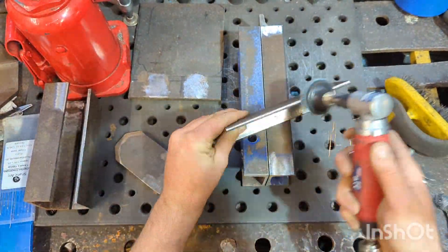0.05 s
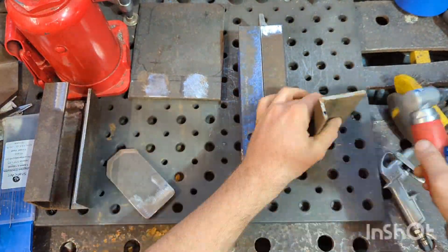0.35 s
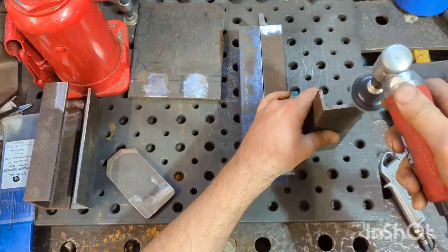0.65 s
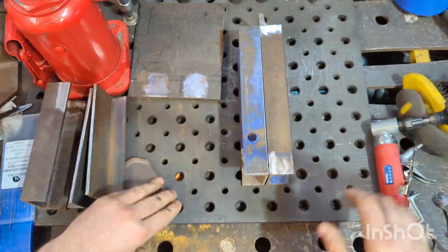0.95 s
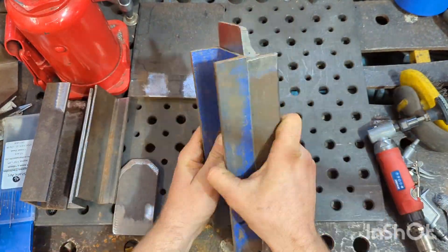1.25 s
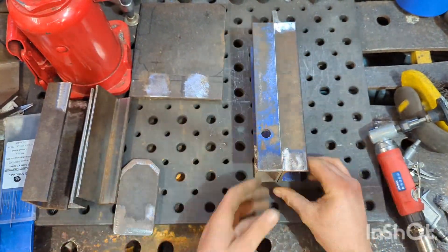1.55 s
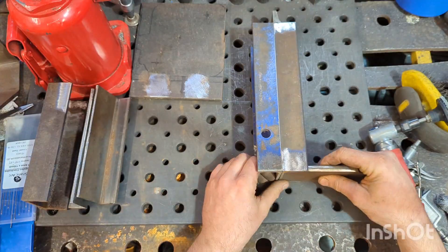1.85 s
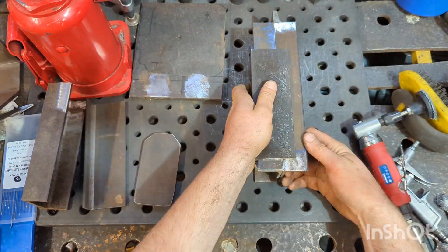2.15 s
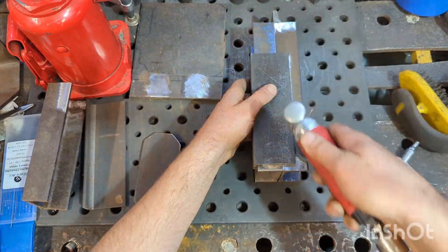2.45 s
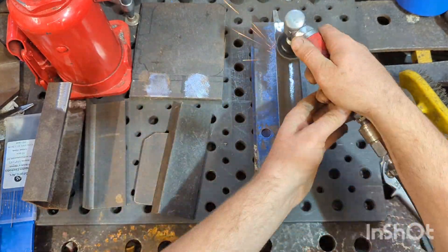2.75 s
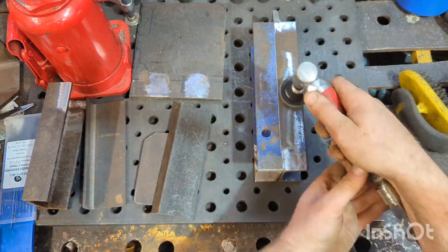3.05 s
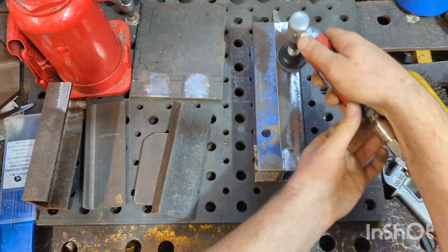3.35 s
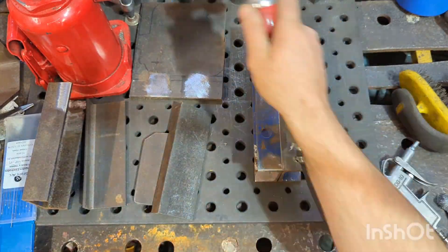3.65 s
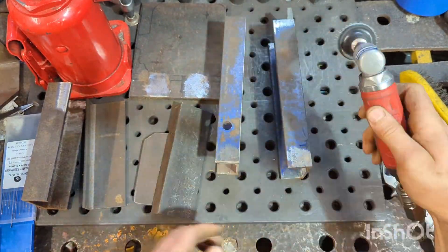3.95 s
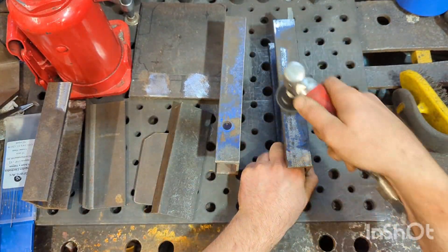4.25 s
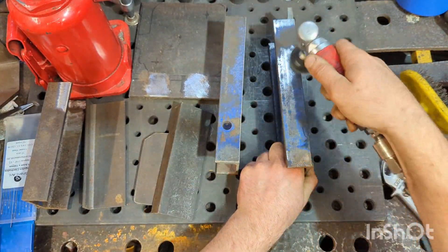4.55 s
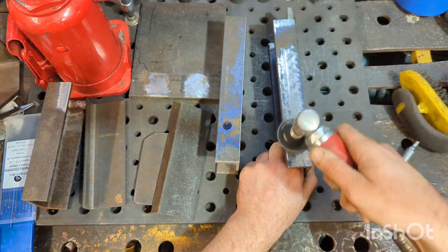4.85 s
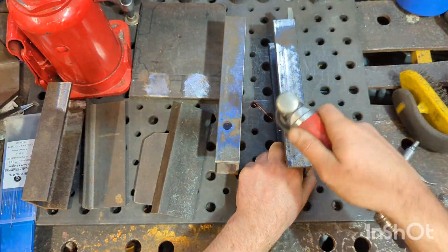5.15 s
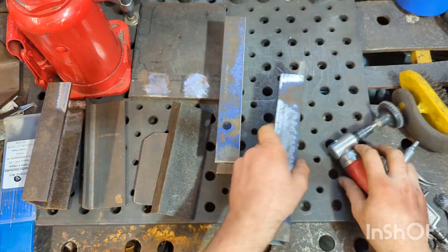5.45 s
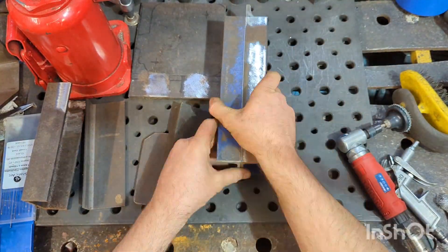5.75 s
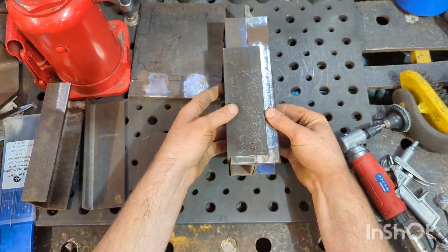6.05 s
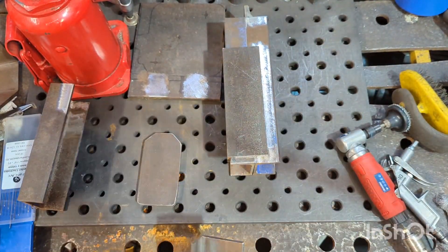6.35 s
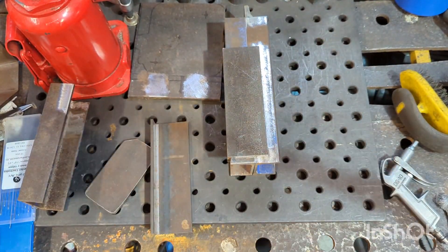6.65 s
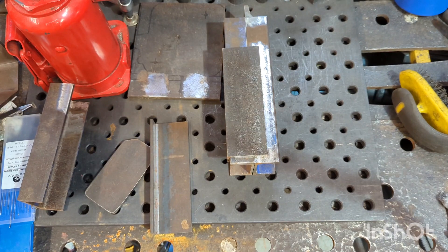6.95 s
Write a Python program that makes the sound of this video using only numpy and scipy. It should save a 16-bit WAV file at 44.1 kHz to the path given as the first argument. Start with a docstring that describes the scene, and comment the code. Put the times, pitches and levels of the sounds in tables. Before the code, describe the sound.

Choppy bursts of an air grinder rasping on steel alternate with clanks of parts set down, as a compressor-like drone joins halfway.

```python
"""Air die grinder on steel: rotor whine, grit scrape and exhaust air come in short bursts that break off
abruptly. Hand pressure slows the disc and the whine sags; the disc grabs edges and makes the steel squeal.
Mostly between bursts, steel pieces and the tool are set down on a welding table, every ring cut short. From
about 4 s a machine, probably a compressor, drones and hisses in the workshop."""
import sys
import numpy as np
from scipy import signal
from scipy.fft import rfft, irfft, next_fast_len
from scipy.io import wavfile
from scipy.ndimage import map_coordinates

SR = 44100
rng = np.random.default_rng(int(sys.argv[2]) if len(sys.argv) > 2 else 0)


def wav_record(signal):
    """Record a signal, one row per channel, as 16-bit PCM in the file named by sys.argv[1]."""
    frames = np.transpose(np.atleast_2d(signal))
    bounded = np.clip(frames, -1, 1)
    # unit amplitude maps onto the largest positive 16-bit level
    quanta = np.round(bounded * 32767).astype(np.int16)
    wavfile.write(sys.argv[1], SR, quanta)


N = 312651

# Room tone spectrum: f/Hz, relative density/dB
ROOM_SPECTRUM = [(30, -15.5), (90, -7), (200, -12.5), (300, -8), (420, 3), (800, -12), (2000, -14.5),
                 (5000, -24), (15000, -32.5)]
# Room tone envelope: t/s, level/dB
ROOM_LEVEL = [(.15, -72.5), (1.02, -64.5), (1.18, -77), (1.65, -73.5), (1.8, -88), (2.02, -67), (2.2, -74)]
# Workshop decay: f/Hz, t60/s
ROOM_DECAY = [(200, 0.14), (2000, 0.12), (12000, 0.033)]
# Stereo image of room tone and machine: f/Hz, left-right coherence
ROOM_COHERENCE = [(60, 0.97), (170, 1), (280, 0.87), (420, 0.57), (950, -0.35), (2400, -0.0067),
                  (15000, .05)]

# Machine envelope: t/s, drone level/dB, hiss level/dB
MACHINE_LEVELS = [(4.05, -100, -100), (4.09, -39, -44), (5.4, -39.5, -40.5), (5.5, -37, -40.5),
                  (5.8, -35.5, -38.5), (6.92, -34, -36.5), (7.0, -38.5, -37.5), (7.09, -43, -63)]
# Machine noise spectra: f/Hz, relative density/dB
DRONE_SPECTRUM = [(15, -43.5), (25, -17), (141, 0.5), (173, -5.5), (206, -2.5), (285, -10), (368, -9.5),
                  (408, -12.5), (493, -11.5), (575, -3.5), (648, -8.5), (852, -3), (1160, -12.5),
                  (1330, -19), (1500, -46.5), (1950, -66.5), (3300, -120)]
HISS_SPECTRUM = [(900, -3), (1400, -4), (2300, -1.5), (3000, -9), (4000, -6), (5200, -13.5), (6000, -5),
                 (6550, 3), (7300, -16.5), (8600, -16), (9500, -22), (11200, -24.5), (14000, -15),
                 (16000, -22.5)]
# Machine hum lines: f/Hz, relative level/dB
HUM_LINES = [(92, -55.5), (150.7, -44.5), (205, -47), (220, -50), (258, -51.5), (367, -51), (440, -54),
             (566, -51), (587, -48), (786, -46.5), (836, -47.5), (856, -47), (1026, -54), (1165, -52)]

# Modes of angle iron, flat plate, channel section, table: f/Hz, relative level/dB, free t60/s
ANGLE_MODES = [(1863, -6, 0.39), (3450, -2.5, 0.26), (3600, -12.5, 0.13), (4135, -4.5, 0.39),
               (5028, -16, .2), (5700, -12.5, 0.2), (6400, -11, 0.2), (7800, -16, 0.1), (8600, -10, 0.11),
               (9850, -23.5, .1), (12280, -16.5, .15), (13500, -20, .15)]
PLATE_MODES = [(1560, -8.5, 0.065), (1830, -2, .15), (3880, -32, 0.31), (4040, -3, .15), (4590, 1.5, 0.22),
               (5900, -24, .15), (7000, -15.5, .1), (10020, -0.5, 0.25), (11800, -1, 0.083),
               (13100, -4, 0.37)]
CHANNEL_MODES = [(1830, -5.5, 0.33), (3400, -2.5, .1), (3671, -5.5, .2), (4130, -1, 0.45),
                 (5087, -10, 0.17), (6220, 0, 0.088), (7720, -9.5, 0.09), (8950, -3, .08),
                 (11800, -6.5, 0.19), (12440, -30.5, .08), (15500, -18, .15)]
TABLE_MODES = [(404, -11, 0.12), (650, -5, 0.19), (1220, -4, 0.12), (2150, 3, 0.07), (2400, -2, 0.28),
               (2620, -8, 0.081), (3260, -11.5, .08), (3580, -3, 0.089), (6900, -22.5, 0.093)]
# Blows on each: t/s, level/dB, rise/s, tilt/(dB/octave), favoured mode f/Hz, its lead/dB
ANGLE_CLINKS = [(.197, -32.5, 0.0032, -4.5, 1863, -0.5), (.232, -41.5, .013, -5.5, 4170, -3),
                (.28, -51, 0.01, -5, 4170, 0), (.35, -36, .016, -3, 4130, 3),
                (.592, -40, .003, -6, 4230, -2), (.884, -48, .013, 0, 3550, -7),
                (.911, -32.5, 0.0083, -1, 3580, 3), (.971, -36, 0.01, -0.5, 3790, 18),
                (1.003, -49, 0.0045, -10, 1560, -7), (2.141, -45.5, .013, -6, 1863, -3),
                (5.95, -32, .0035, 1, 5520, -1.5), (6.009, -24, 0.0018, -3, 1863, -2.5),
                (6.198, -25, .02, 2.5, 5560, 4)]
PLATE_CLACKS = [(.3113, -25, 0.0068, 0, 3840, 1.91), (1.096, -35, .014, 0, 6750, 4.6),
                (1.924, -28, 0.024, -1, 3790, 8), (1.926, -24, 0.023, 1, 13100, 6)]
CHANNEL_CLANKS = [(2.026, -41.5, 0.0067, -9, 1830, -4), (2.052, -23.5, .006, -0.6, 5087, 8),
                  (2.089, -25.5, 0.01, 3, 11800, 1), (2.533, -27.5, .012, 0.5, 3482, -5)]
TABLE_KNOCKS = [(1.336, -25.5, .004, -4.5, 2150, 3.1), (1.3435, -27.5, .0011, -1, 6900, 1.4),
                (1.628, -57, 0.0098, -3, 4630, 3.5), (1.675, -53.5, 0.0079, -4, 1950, 5.5),
                (3.892, -26.5, 0.0035, -4.5, 2400, 21), (3.911, -32, 0.0038, -1, 2620, 10.5),
                (5.642, -29.5, 0.0034, 4.5, 6000, 1.5)]
# Crowded steel modes: f/Hz, relative density/dB
CLATTER_SPECTRUM = [(80, -29), (400, -15), (1000, -11.5), (1900, -5), (4000, -5), (5200, -6.5), (7500, -9),
                    (10000, -15.5), (12500, -17.5), (16000, -31)]

# Disc grabs an edge: t/s, level/dB, rise/s, life/s, f/Hz
DISC_GRABS = [(.428, -45.5, 0.0046, 0.014, 311), (2.564, -32, 0.0031, 0.018, 296),
              (3.445, -34, 0.0027, 0.029, 420), (3.974, -32.5, .008, 0.011, 370)]
# Disc catches a steel mode: centre t/s, f/Hz, level/dB
DISC_SQUEALS = [(.574, 6280, -36.5), (.693, 2130, -35), (2.46, 3390, -31.5), (2.779, 5133, -33.5),
                (2.86, 1560, -33), (2.866, 3130, -32.5), (3.511, 2870, -32.5), (4.385, 3489, -31.5),
                (4.78, 3138, -34.5), (5.225, 3170, -29)]
# Held workpiece resonances: f/Hz, width/Hz, relative level/dB
WORK_MODES = [(3170, 540, -10.5), (6500, 900, 3), (8780, 100, 1)]
# Rotor orders: multiple of the pitch, relative level/dB
ROTOR_ORDERS = [(1, 4), (2, -7.5), (3, -16.5), (4, -21.5), (5, -29.5), (6, -18)]
# Grinder noise spectra: f/Hz, relative density/dB
SCRAPE_SPECTRUM = [(30, -38.5), (90, -17), (200, -10), (450, -7), (800, -1.5), (1300, -2.5), (2200, 2.5),
                   (3500, 3.5), (5200, 0), (6600, -2.5), (8300, -4.5), (9500, -9), (16000, -14.5)]
EXHAUST_SPECTRUM = [(3000, -34), (7000, -9), (9500, -10), (10400, -6.5), (11200, -7.5), (12300, 0),
                    (13500, -6.5), (15000, -3.5), (16000, -17.5)]
# Grinder stereo image: f/Hz, left-right coherence
GRINDER_COHERENCE = [(60, 0.94), (180, 0.59), (550, 0.77), (1650, 0.11), (4970, 0.04), (15000, 0.09)]
# Grinder balance: f/Hz, left minus right/dB
GRINDER_BALANCE = [(300, -0.5), (640, 0), (1400, 0), (3100, -2), (6800, -4), (9000, 1), (15000, 1)]
# Grinder bursts: start/s, end/s, rise/s, scrape level/dB, exhaust level/dB
GRINDER_BURSTS = [(-.02, 0.117, .01, -31, -31.5), (0.423, 0.598, 0.022, -29.5, -33),
                  (0.639, 0.857, 0.0024, -30, -33), (2.364, 2.515, 0.022, -28, -33.5),
                  (2.547, 3.75, 0.015, -29, -35), (3.97, 5.363, 0.014, -30, -32),
                  (5.386, 5.457, .014, -28.5, -34.5), (6.954, 7.119, 0.019, -33, -28)]
# Whine, one table per pass over the steel: t/s, nominal f/Hz, nominal level/dB
DISC_PASSES = [
    [(0.005, 947, -36), (0.079, 963, -39.5), (0.087, 1118, -33), (0.105, 1131, -41.5)],
    [(0.44, 1201, -41), (0.51, 898, -44.5), (0.52, 1152, -31), (0.554, 1128, -31), (0.568, 825, -33.5),
     (0.585, 824, -34.5)],
    [(0.645, 1313, -34), (0.681, 1255, -42), (0.707, 950.6, -35), (0.767, 884.7, -34.5), (0.809, 1213, -36),
     (0.833, 677, -29), (0.845, 679, -39)],
    [(2.375, 1064, -37.5), (2.403, 1197, -33), (2.469, 801, -30), (2.5, 813, -37)],
    [(2.58, 1274, -46), (2.592, 1272, -34.5), (2.676, 921.5, -31.5), (2.74, 824.9, -33.5),
     (2.89, 777.8, -38), (2.956, 885, -30), (3.156, 591.3, -39), (3.28, 582.8, -31.5),
     (3.302, 524.8, -37.5), (3.416, 657, -35), (3.444, 597.9, -49), (3.524, 718.6, -39), (3.55, 544.3, -28),
     (3.578, 703, -40), (3.598, 665.7, -27.5), (3.632, 1046, -37), (3.7, 1074, -31.5), (3.73, 855, -52.5)],
    [(3.99, 1034, -35), (4.016, 1173, -30), (4.058, 707.7, -31), (4.224, 628, -31), (4.266, 536.9, -33),
     (4.454, 612.8, -33), (4.682, 536.4, -29), (4.902, 681.2, -37.5), (4.928, 525.3, -32),
     (5.012, 433.9, -32), (5.05, 519.7, -39.5), (5.08, 467.4, -35.5), (5.13, 588, -29), (5.19, 514, -33),
     (5.22, 814.7, -40), (5.288, 645.7, -31), (5.33, 1000, -43.5), (5.35, 1033, -36)],
    [(5.4, 1198, -49.5), (5.435, 1114, -34), (5.47, 1105, -80)],
]

TOP_HZ = 15950


def amp(db):
    """Decibels to gain."""
    return 10 ** (np.asarray(db) / 20)


def unit(x):
    """Scale to rms 1."""
    return x / np.sqrt(np.mean(x ** 2) + 1e-20)


def split(difference):
    """Left-minus-right difference as two opposite halves."""
    return difference * np.array([[.5], [-.5]])


def along(points, hz):
    """(f/Hz, value) points read on a log axis."""
    f, v = np.transpose(points)
    return np.interp(np.log(hz + 1), np.log(f + 1), v)


def curves(rows):
    """Per-sample curve for each column after t/s."""
    s, *cols = np.transpose(rows)
    return [np.interp(np.arange(N) / SR, s, c) for c in cols]


def wobble(rate_hz):
    """Smooth random curve, knots at rate_hz."""
    knots = rng.standard_normal(int(N * rate_hz / SR) + 4)
    return map_coordinates(knots, [np.arange(N) * rate_hz / SR])


def filtered(x, response):
    """Apply a frequency response."""
    size = x.shape[-1]
    m = next_fast_len(size + 4096)
    return irfft(rfft(x, m) * response(np.fft.rfftfreq(m, 1 / SR)), m)[..., :size]


def stereo_noise(spectrum, coherence):
    """Noise of rms 1 with given spectrum and left-right coherence."""
    def response(hz):
        angle = np.arccos(np.clip(along(coherence, hz), -1, 1)) / 2
        return amp(along(spectrum, hz)) * [np.cos(angle), np.sin(angle)]
    mid, side = filtered(rng.standard_normal((2, N)), response)
    return unit(np.array([mid + side, mid - side]))


def ramp(u):
    """Smooth step, 0 to 1."""
    return np.sin(np.pi / 2 * np.clip(u, 0, 1)) ** 2


def choked(t, rise_s, life_s):
    """Contact envelope: builds up, then dies ever faster."""
    return ramp(t / rise_s) * np.exp(-(np.maximum(t - rise_s, 0) / life_s) ** 2)


def room_tone():
    """Faint, wavering noise of the still room."""
    level_db = curves(ROOM_LEVEL)[0] + 4.4 * wobble(17)
    return amp(level_db) * stereo_noise(ROOM_SPECTRUM, ROOM_COHERENCE)


def room_reverb(x):
    """Short tail of the cluttered workshop; treble dies first."""
    hz, t, z = signal.stft(rng.standard_normal((2, SR // 4)), SR, nperseg=256)
    tail = signal.istft(z * amp(-60 * t / along(ROOM_DECAY, hz)[:, None]), SR, nperseg=256)[1]
    return signal.fftconvolve(x, tail / np.linalg.norm(tail[0]), axes=1)[:, :N]


def machine(crank_hz=23.74, throb=.49, hum_gain_db=2, rumble_gain_db=-.5):
    """Piston-chopped rumble, unsteady hum lines and air hiss."""
    drone_db, hiss_db = curves(MACHINE_LEVELS)
    t = np.arange(N) / SR
    hum = np.zeros((2, N))
    for hz, db in HUM_LINES:
        # wall reflections put the higher lines out of step left to right
        offset_rad = split(np.arccos(np.clip(along(ROOM_COHERENCE, hz), -1, 1)))
        hum += amp(db) * np.sqrt(2) * np.sin(2 * np.pi * hz * t + offset_rad + .55 * wobble(16))
    hum *= amp(hum_gain_db + drone_db - drone_db.max())
    rumble = amp(drone_db + rumble_gain_db) * stereo_noise(DRONE_SPECTRUM, ROOM_COHERENCE)
    upper_rumble = filtered(rumble, lambda hz: hz ** 4 / (hz ** 4 + 600 ** 4))
    crank_rad = 2 * np.pi * crank_hz * t + .5 * wobble(6)
    chug = throb * (np.cos(crank_rad) + np.cos(2 * crank_rad))  # two pistons a turn
    hiss = amp(hiss_db) * stereo_noise(HISS_SPECTRUM, ROOM_COHERENCE)
    return rumble + chug * upper_rumble + hum + hiss


def ringing(hz, db, t60_s, t):
    """Decaying modes, initial rms 1; phase and strength vary per channel."""
    strength = amp(db + 2 * rng.standard_normal((2, len(hz))))[..., None]
    phase = 2 * np.pi * rng.random((len(hz), 1)) + .6 * rng.standard_normal((2, len(hz), 1))
    decay = amp(-60 * t / np.reshape(t60_s, (-1, 1)))
    waves = strength * decay * np.sin(2 * np.pi * np.outer(hz, t) + phase)
    return waves.sum(1) / np.sqrt(np.sum(strength ** 2) / 4)


def touches(at_s=1.3, level_db=-62, scatter_db=7, rise_s=.014, tilt_db=2, count=6):
    """Blow rows for faint simultaneous contacts on the table."""
    mode_hz = [mode[0] for mode in TABLE_MODES]
    levels_db = level_db + scatter_db * rng.standard_normal(count)
    return [(at_s, db, rise_s, tilt_db, rng.choice(mode_hz), 0) for db in levels_db]


def knocks(hits, modes, life_s, clatter_db, scuff_db, pan_db, grip_detune=.013, count=64):
    """Blows on steel: main modes detuned by the grip, a crowd of weak modes, surface scuff."""
    out, t = np.zeros((2, N + SR)), np.arange(SR // 9) / SR
    mode_hz, mode_db, t60_s = np.transpose(modes)
    crowd_hz = 300 + (TOP_HZ - 300) * ((np.arange(count) + rng.random(count)) / count) ** 1.5
    for s, db, rise_s, tilt_db, spot_hz, lead_db in hits:
        colour_db = lambda hz: tilt_db * np.log2(np.maximum(hz, 1500) / 4000)
        crowd_db = lambda hz: along(CLATTER_SPECTRUM, hz) + colour_db(hz)
        main_db = mode_db + colour_db(mode_hz)
        main_hz = mode_hz * (1 + grip_detune * rng.standard_normal(len(modes)))
        # struck spot and grip favour one mode
        favoured = np.argmin(abs(mode_hz - spot_hz))
        main_hz[favoured], main_db[favoured] = spot_hz, main_db.max() + lead_db
        main = ringing(main_hz, main_db, t60_s, t)
        crowd = ringing(crowd_hz, crowd_db(crowd_hz) + 4 * rng.standard_normal(count), t60_s=.2, t=t)
        noise = rng.standard_normal((2, len(t))) + .46 * rng.standard_normal(len(t))
        scuff = unit(filtered(noise, lambda hz: amp(crowd_db(hz))))
        blow = main + amp(clatter_db) * crowd + amp(scuff_db) * scuff
        out[:, int(s * SR):][:, :len(t)] += amp(db) * choked(t, rise_s, life_s) * blow
    return out[:, :N] * amp(split(pan_db))


def grabs(jolt_db=-15, jolt_hz=90):
    """Disc catches an edge: low thump plus a dull jolt of the table."""
    out, t = np.zeros(N + SR), np.arange(SR // 8) / SR
    jolt = lambda hz: amp(jolt_db) / (1 + (hz / jolt_hz) ** 4)
    for s, db, rise_s, life_s, centre_hz in DISC_GRABS:
        band = lambda hz: 1 / (1 + 1.2j * (hz / centre_hz - centre_hz / (hz + 1))) ** 2
        thump = unit(filtered(rng.standard_normal(len(t)), lambda hz: band(hz) + jolt(hz)))
        out[int(s * SR):][:len(t)] += amp(db) * choked(t, rise_s, life_s) * thump
    return out[:N]


def squeals(width_hz=110, sigma_s=.016, pan_db=-2, faint_hz=(2570, 3138, 3550), faint_db=-36, count=9):
    """Narrow steel modes swell and fade under the disc; faint random ones join in the long bursts."""
    out, t = np.zeros((2, N + SR)), np.arange(SR // 4) / SR - 1 / 8
    grinding_s = np.concatenate([np.arange(start + .1, end - .1, .01)
                                 for start, end, *_ in GRINDER_BURSTS if end - start > 1])
    faint = [(rng.choice(part), rng.choice(faint_hz), faint_db)
             for part in np.array_split(grinding_s, count)]
    swell = np.exp(-(t / sigma_s) ** 2 / 2)
    for s, mode_hz, db in list(DISC_SQUEALS) + faint:
        noise = rng.standard_normal((2, len(t))) + rng.standard_normal(len(t))
        ring = swell * filtered(noise, lambda hz: 1 / (1 + (2 * (hz - mode_hz) / width_hz) ** 2))
        out[:, int((s + t[0]) * SR):][:, :len(t)] += amp(db) * unit(ring) * np.sqrt(np.mean(swell ** 2))
    return out[:, :N] * amp(split(pan_db))


def workpiece(hz):
    """Resonant response of the held steel."""
    return sum((-1) ** k * amp(db) * 1j * hz * width / (centre ** 2 - hz ** 2 + 1j * hz * width)
               for k, (centre, width, db) in enumerate(WORK_MODES))


def mottled(x, depth_db):
    """Crowded steel modes rise and sink as the contact point travels."""
    z = signal.stft(x, nperseg=1024)[2]
    patch = np.outer(np.hanning(7), np.hanning(9))[None]
    field = signal.fftconvolve(rng.standard_normal((3,) + z.shape[1:]), patch, "same", axes=(1, 2))
    gain = amp(depth_db * unit(field[:2] + 2 * field[2]))
    return unit(signal.istft(z * gain, nperseg=1024)[1][:, :N])


def bounced(x, share):
    """Add dense early reflections off the table and parts."""
    t = np.arange(SR // 16) / SR
    paths = (rng.standard_normal((2, len(t))) + rng.standard_normal(len(t))) * choked(t, .0017, .017)
    return x + share * unit(signal.fftconvolve(x, paths, axes=1)[:, :N]) * x.std()


def whine(phase, pitch_hz, flutter_db=3.4, spread_rad=.8):
    """Rotor fundamental, overtones (stronger on a loaded, slower disc) and the steel they ring."""
    load = np.clip(800 / pitch_hz, .5, 1.4)
    first, overtones, drive = np.zeros((3, 2, N))
    for order, db in ROTOR_ORDERS:
        # table reflections shift each channel's phase as the tool moves
        offset_rad = split(spread_rad * np.sqrt(order) * wobble(12))
        chatter_rad = .45 * load * order ** .25 * wobble(110)
        flutter = unit(amp(flutter_db * wobble(70)))
        line = np.sqrt(2) * np.sin(order * phase + offset_rad + chatter_rad) * flutter
        first += line * amp(db) * (order == 1)
        overtones += line * amp(db) * load * (order > 1)
        drive += line * (order > 2)
    return first, overtones, unit(filtered(drive, workpiece))


def scrape(phase, chop=.39, body_db=-9, low_cut_hz=170):
    """Grit tears at the steel once a turn and excites the workpiece."""
    contact = unit((1 + chop * np.cos(phase)) * amp(wobble(900) + .5 * wobble(35)))
    grit = contact * stereo_noise(SCRAPE_SPECTRUM, GRINDER_COHERENCE)
    grit = filtered(grit, lambda hz: hz ** 2 / (hz ** 2 + low_cut_hz ** 2))
    body = unit(filtered(contact * rng.standard_normal((2, N)), workpiece))
    return mottled(grit + amp(body_db) * body, depth_db=3.6)


def exhaust():
    """Spent air: a high, flickering hiss."""
    air = mottled(stereo_noise(EXHAUST_SPECTRUM, GRINDER_COHERENCE), depth_db=2.9)
    return air * amp(.77 * wobble(44))


def grinder(fall_s=.03, usual_db=-33.5, first_gain_db=-2, overtone_gain_db=1, ring_gain_db=-7):
    """Whine, scrape and exhaust in bursts; hand pressure slows the disc and trades whine for scrape."""
    t = np.arange(N) / SR
    running, scrape_gain, exhaust_gain = np.zeros((3, N))
    for start_s, end_s, rise_s, scrape_db, exhaust_db in GRINDER_BURSTS:
        gate = ramp((t - start_s) / rise_s) * ramp((end_s - t) / fall_s)
        running += gate
        scrape_gain += gate * amp(scrape_db)
        exhaust_gain += gate * amp(exhaust_db)
    pitch_hz, whine_db = curves(np.concatenate(DISC_PASSES))
    pressure = wobble(rate_hz=26)
    sag = .02 * pressure * (800 / pitch_hz) ** 2  # deeper when already slow
    judder, drift = .02 * wobble(240), .01199 * wobble(50)
    phase = 2 * np.pi * np.cumsum(pitch_hz * (1 - sag + judder + drift)) / SR
    first, overtones, ring = whine(phase, pitch_hz)
    swing_db = whine_db - usual_db
    rasp_db = usual_db + .49 * swing_db  # overtones and ring follow about half the swing
    first *= amp(whine_db + first_gain_db - 2 * pressure)
    overtones *= amp(rasp_db + overtone_gain_db)
    tone = bounced(first + overtones, share=.45) + amp(rasp_db + ring_gain_db) * ring
    scrape_gain *= amp(.4 * pressure - .17 * np.clip(swing_db, -6, 6))
    sound = running * tone + scrape_gain * scrape(phase) + exhaust_gain * exhaust()
    return filtered(sound, lambda hz: amp(split(along(GRINDER_BALANCE, hz))))


def scene(reverb_db=-22):
    """Grinding and steel handling over the workshop background."""
    near = grinder() + squeals() + grabs()
    near += knocks(ANGLE_CLINKS, ANGLE_MODES, life_s=.015, clatter_db=-5, scuff_db=-10, pan_db=-1)
    near += knocks(PLATE_CLACKS, PLATE_MODES, life_s=.012, clatter_db=-6, scuff_db=-7, pan_db=-1)
    near += knocks(CHANNEL_CLANKS, CHANNEL_MODES, life_s=.017, clatter_db=-7, scuff_db=-10, pan_db=0)
    table_blows = list(TABLE_KNOCKS) + touches()
    near += knocks(table_blows, TABLE_MODES, life_s=.011, clatter_db=-4, scuff_db=-6.5, pan_db=-1)
    return room_tone() + amp(reverb_db) * room_reverb(near) + machine() + near


def record(dry):
    """Steep low-pass at TOP_HZ."""
    return filtered(dry, lambda hz: ramp((TOP_HZ - hz) / 500 + .5))


dry = scene()
out = record(dry)
wav_record(out)
```